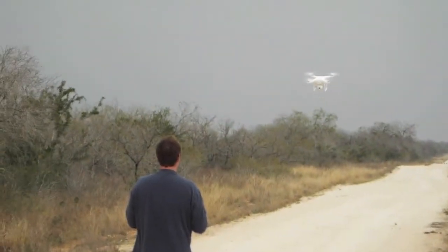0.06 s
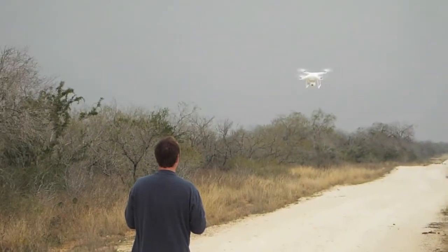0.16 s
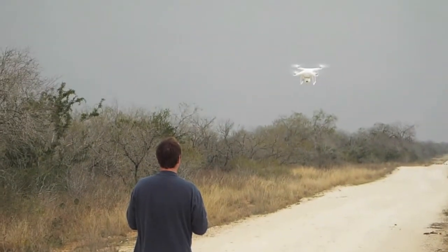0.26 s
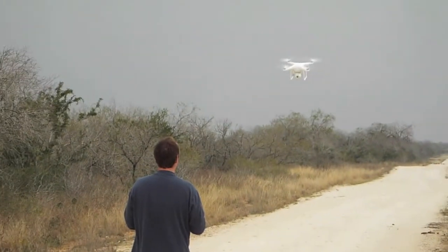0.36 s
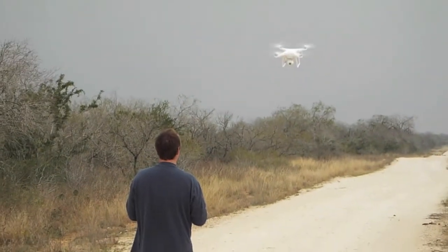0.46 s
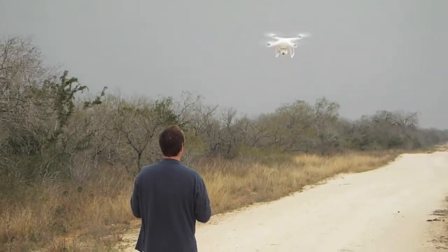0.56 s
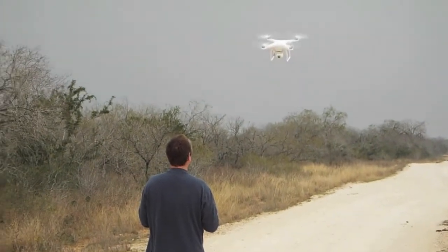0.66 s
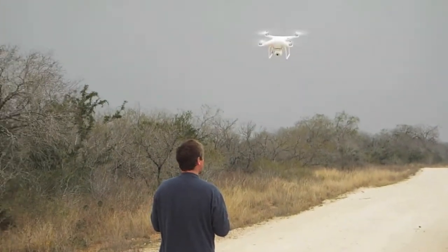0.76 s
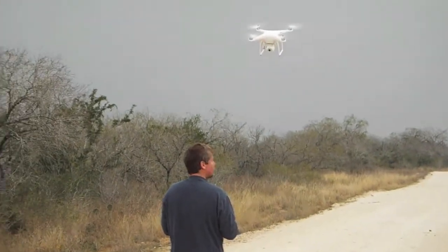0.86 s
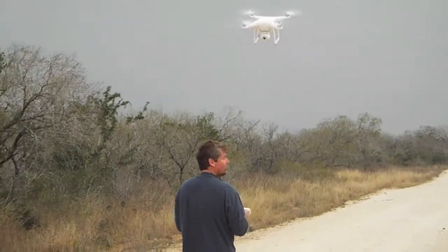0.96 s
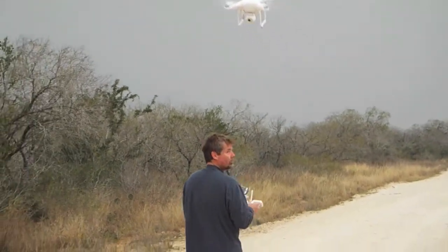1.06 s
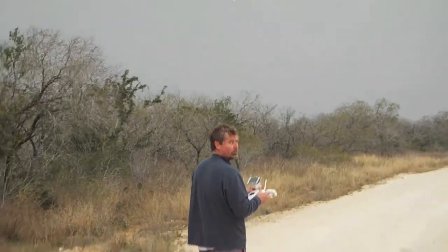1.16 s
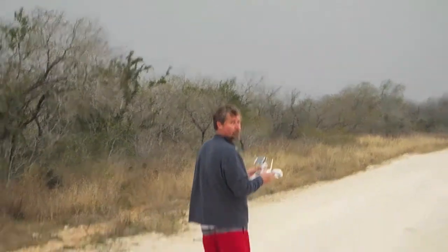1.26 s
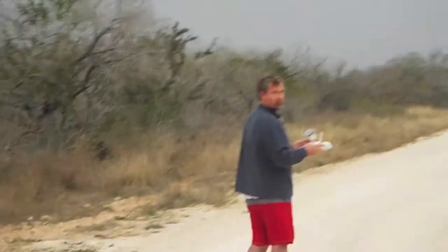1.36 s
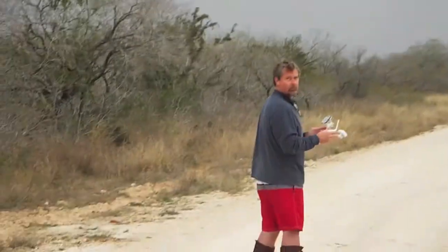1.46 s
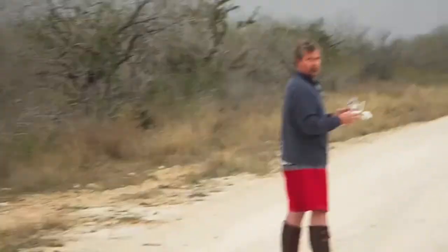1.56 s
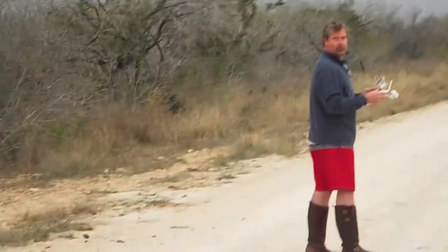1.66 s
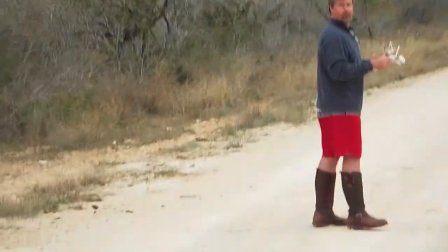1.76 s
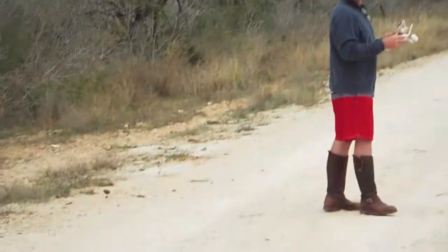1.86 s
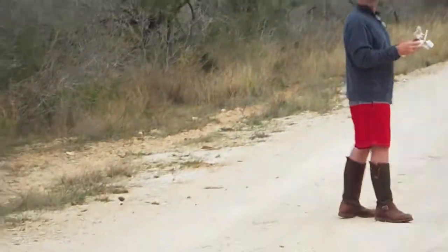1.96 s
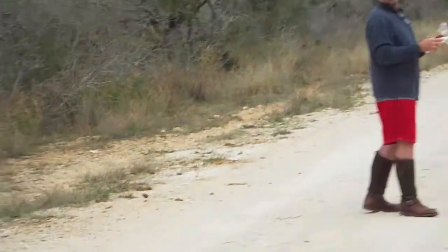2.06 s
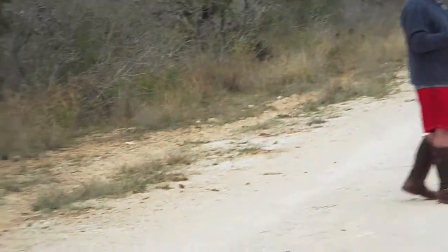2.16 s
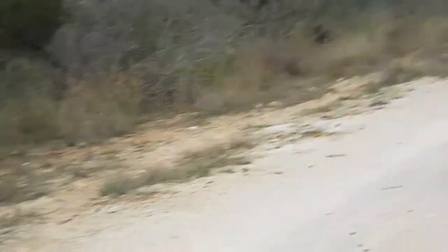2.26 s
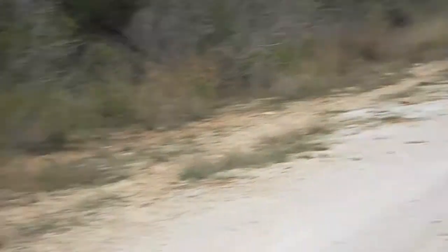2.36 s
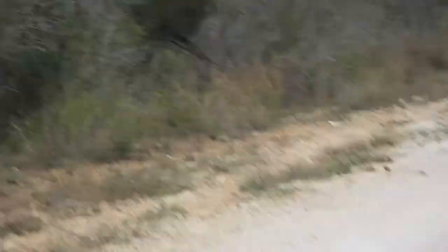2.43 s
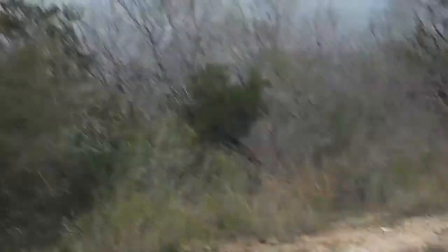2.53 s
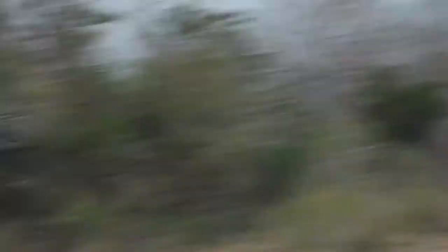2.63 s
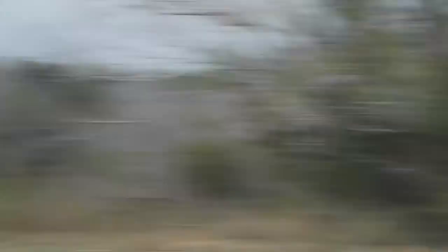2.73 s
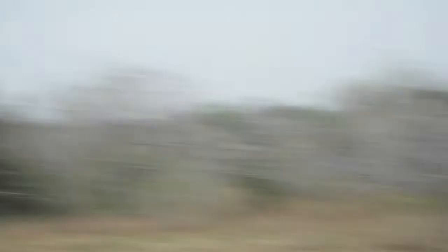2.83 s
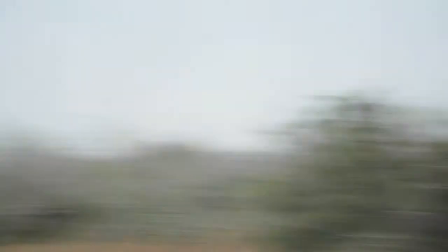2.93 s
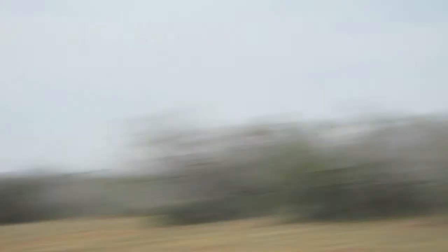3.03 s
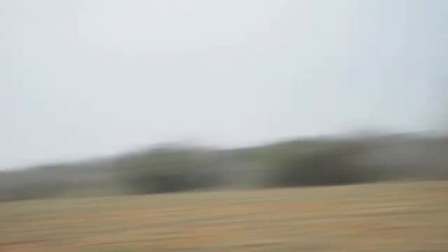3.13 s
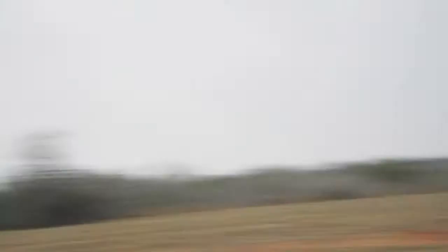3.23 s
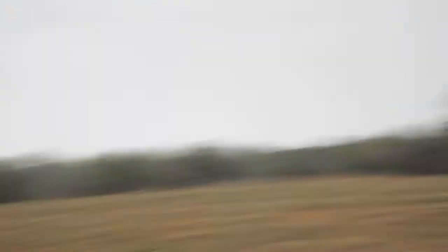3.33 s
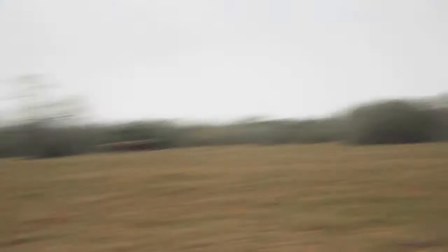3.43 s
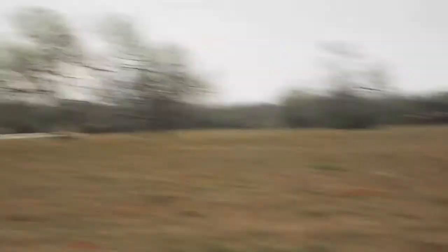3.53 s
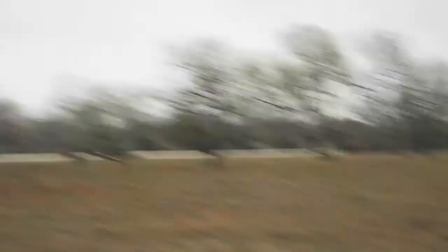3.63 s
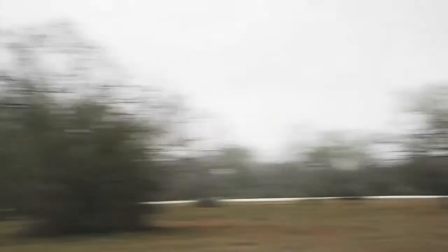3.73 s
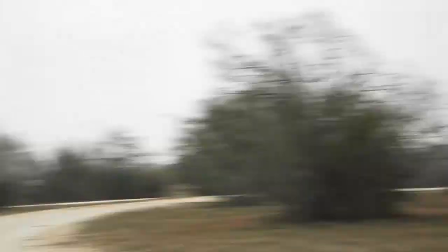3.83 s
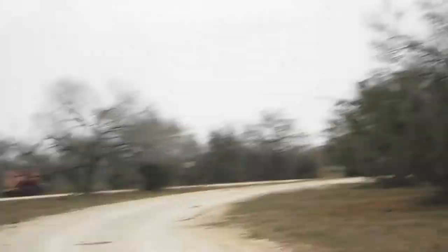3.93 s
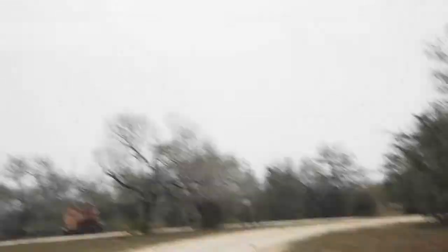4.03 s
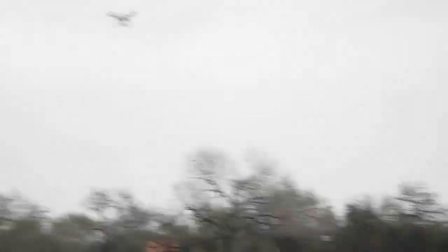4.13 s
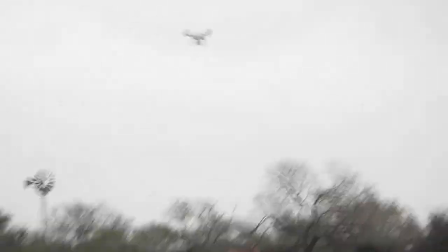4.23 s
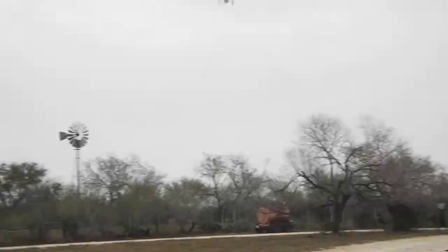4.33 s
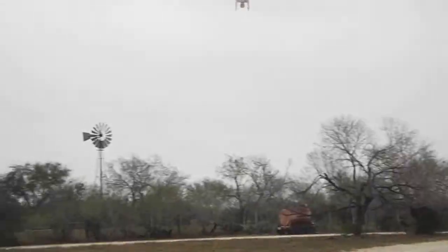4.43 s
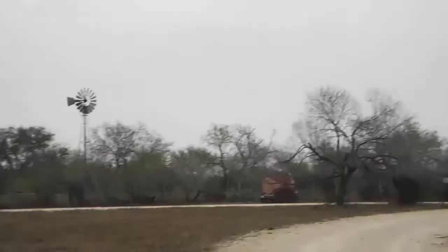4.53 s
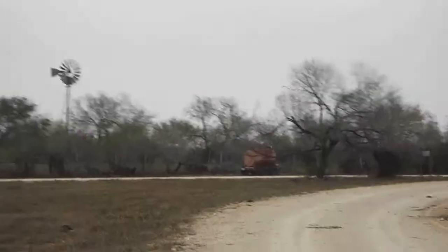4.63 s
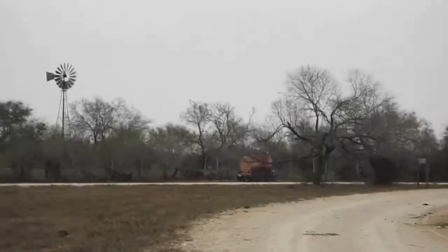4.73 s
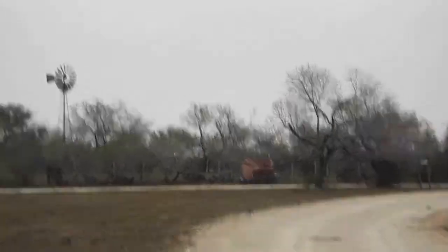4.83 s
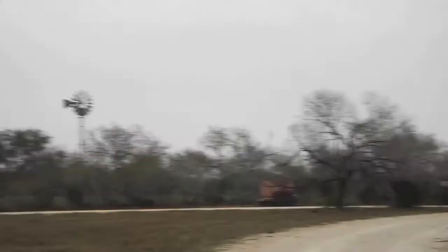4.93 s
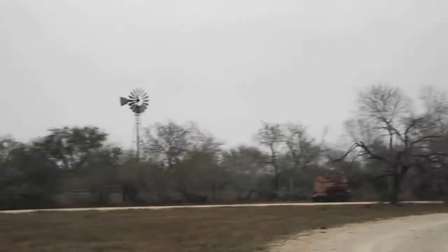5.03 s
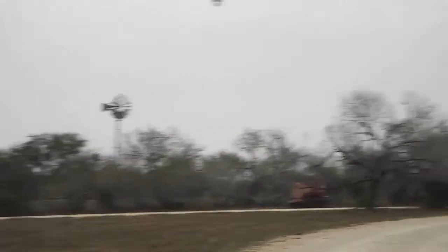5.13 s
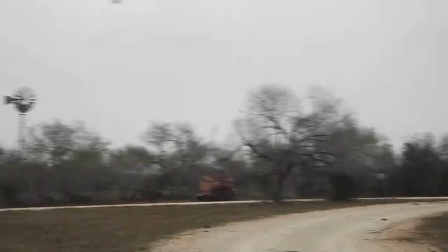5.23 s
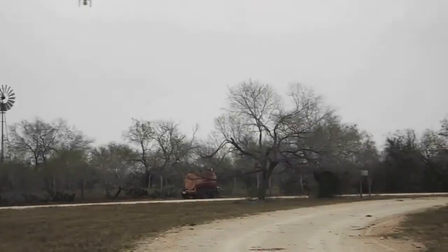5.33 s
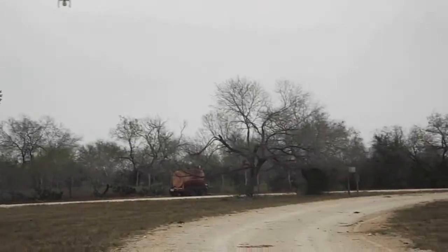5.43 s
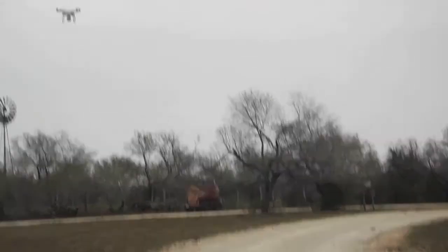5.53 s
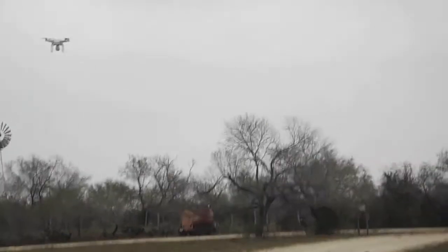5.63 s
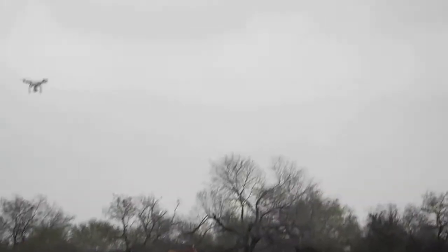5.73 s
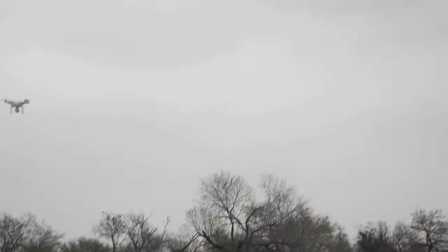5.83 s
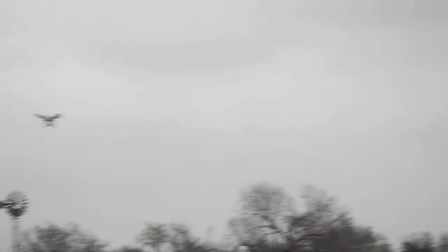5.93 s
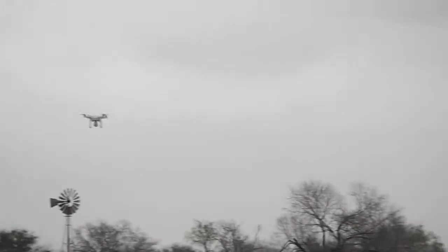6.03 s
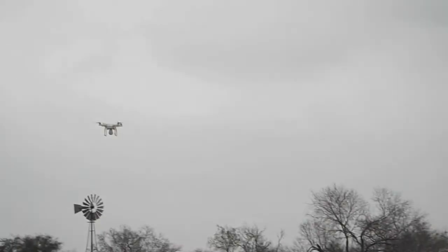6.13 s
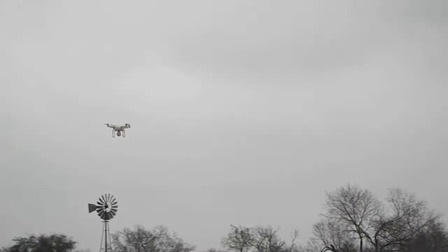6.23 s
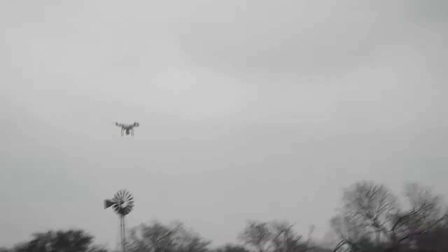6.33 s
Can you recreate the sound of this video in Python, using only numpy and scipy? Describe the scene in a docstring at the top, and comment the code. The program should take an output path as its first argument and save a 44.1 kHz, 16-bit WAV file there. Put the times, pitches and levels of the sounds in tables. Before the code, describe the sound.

Four slightly mistuned propellers buzz ahead, growing louder and raspier until the drone rushes overhead close to a hand-held stereo microphone. The pitch sinks as it leaves, smoother and hissier. Wind buffets the microphone in low knocks and crackling pops during the swing. The housing clicks loudly once, the motors rise for braking, then ease to a faint steady whirr in open, dry air with little background.

```python
"""Over a dirt road, a small quadcopter flies low, passes close above a hand-held camera, brakes and hovers far off.
Four propellers whine as sets of harmonics and rasp as noise chopped by the blades, each at its own speed.
Delayed copies, off the ground and the camera's body, sweep combs through the sound.
Noise bursts and pressure pulses make the wind on the swinging camera; short decaying noises make its housing click.
A limiter ducks after the loudest knocks."""
import sys
import numpy as np
from scipy import signal
from scipy.fft import rfft, irfft, next_fast_len
from scipy.io import wavfile
from scipy.ndimage import uniform_filter1d, map_coordinates

SR = 44100
rng = np.random.default_rng(int(sys.argv[2]) if len(sys.argv) > 2 else 0)


def store_wav(level_fs):
    """Save 16-bit WAV to argv[1]."""
    pcm = np.round(np.clip(np.atleast_2d(level_fs), -1, 1) * 32767)
    wavfile.write(sys.argv[1], SR, pcm.T.astype(np.int16))


N = 281887
TIME = np.arange(N) / SR
TOP_HZ = 16000  # upper limit of the band

# the four propellers as heard: start_s, blade_pass_hz
LEAD_ROTOR = [(0, 235), (.5, 236), (1.2, 237), (1.6, 240.5), (1.8, 238), (1.98, 236), (2.08, 227),
              (2.2, 224), (2.32, 215), (2.57, 220), (2.7, 207), (2.9, 195), (3.1, 193), (3.4, 185),
              (3.7, 187), (3.95, 185), (4.05, 192), (4.5, 197.5), (4.65, 197), (4.8, 220), (5, 224),
              (5.15, 231), (5.28, 230), (5.48, 213), (5.85, 205), (6.39, 200.5)]
UNBALANCED_ROTOR = [(0, 249), (.6, 246), (1.15, 248), (1.45, 252), (1.92, 249), (2.08, 238), (2.3, 233),
                    (2.45, 233), (2.56, 243), (2.7, 213), (2.85, 214), (3.25, 204), (3.33, 209), (3.6, 208),
                    (3.75, 203), (4, 212), (4.25, 218), (4.45, 230), (4.55, 239), (4.7, 242), (5, 258),
                    (5.08, 269), (5.2, 269), (5.35, 253), (5.48, 235), (5.8, 226), (6.39, 226.5)]
SLOW_ROTOR = [(0, 187), (.5, 186), (1.4, 189.5), (1.9, 188), (2.05, 181), (2.75, 167.4), (3.15, 173.3),
              (4.1, 166), (4.7, 150), (5.15, 152), (5.38, 166), (5.5, 175.5), (6.39, 178)]
TRIM_ROTOR = [(0, 185), (.5, 177.6), (1.4, 213.8), (1.8, 209.7), (2.75, 183.2), (4.7, 158.5), (5.4, 171),
              (6.39, 188.1)]
# tone balance of the whine: pitch_hz, relative_level_db
WHINE = [(110, -29), (185, -14), (240, -12.5), (360, -8.5), (460, -3.5), (525, -2.5), (565, -3.5), (620, 1),
         (710, 3), (850, -5), (950, -5.5), (1070, -8.5), (1190, -6), (1310, -7.5), (1430, -6),
         (1540, -12.5), (1650, -7), (1780, -18.5), (1900, -16), (2100, -14.5), (3200, -19), (5300, -16.5),
         (8000, -67)]
# how strongly the tones carry as the craft tilts:
# start_s, fast_pair_db, slow_pair_db, unsteadiness (1 = calm air)
TONES = [(0, 1, -0.5, 0.58), (.8, 1, 1, 0.69), (1.45, 2, 2, 1.6), (1.8, 3, 3.5, 1.8), (1.97, 4.5, 2.5, 2),
         (2.1, -2, -2, 2.8), (2.4, -2.5, -3, 4), (2.8, -2, -8, 4.6), (3.5, -1, -2, 3), (4.1, 0, -6, 1),
         (4.65, 1.5, -7, .7), (5.15, 0, -7, .7), (5.5, -.5, 1, .7), (5.8, -1.5, 2.5, 0.68),
         (6.39, -1.5, 2, 0.66)]
# the blades sound sharpest as they advance on the listener: start_s, overtones_db, rasp_chop (0-1)
EDGE = [(0, 0, 0.83), (.6, 2, 0.9), (1.15, 4.5, 0.85), (1.5, 6.5, 0.89), (1.97, 4, 0.67), (2.4, 2.5, .55),
        (3, -5, 0.3), (4, 0.5, 0.35), (5.1, -2.5, 0.5), (5.7, 0, 0.14), (6.39, -2, 0.39)]
# turbulence on the blades, up in the pass and the braking flare, down in the hover: start_s, load_db
LOAD = [(0, -5), (.5, 3), (1.93, -1), (2.1, 2.5), (2.24, 0), (2.4, -1), (2.9, 0), (3.04, 2), (3.35, -1.5),
        (3.6, -1.5), (4.5, 1), (5.05, 5.5), (5.2, 4), (5.36, -3), (5.8, -6), (6.39, -4)]

# colour of the rasp from each side of the craft: pitch_hz, relative_level_db (per Hz)
FRONT = [(150, -12), (400, -14), (750, -2.5), (1050, -8.5), (1700, -9.5), (2500, -3), (3050, -9.5),
         (3600, -6), (4450, -7.5), (5000, -1.5), (5800, -1), (6500, -6.5), (7200, -11), (7900, -13.5),
         (8900, -15), (12000, -23), (16000, -36)]
CLOSE = [(150, -40), (400, -12), (750, -6), (1400, 1.5), (2300, -1), (3050, -5.5), (3450, 1), (4200, -3.5),
         (4750, 0), (5300, 5.5), (6000, 2), (6700, -1.5), (8000, -5.5), (11000, -14), (16000, -27)]
OVERHEAD = [(150, -32), (400, -12), (750, -2), (1400, -7), (2200, -2), (3000, -4), (4200, -1.5),
            (5050, 8.5), (5800, 2.5), (6800, -2), (8000, -5.5), (9500, -8), (11000, -9), (16000, -24)]
BELOW = [(150, -38), (400, -9.5), (750, -10.5), (1300, -7), (2100, -15), (3200, -5.5), (4500, -1),
         (5800, 2), (7000, -4), (8500, -9.5), (11000, -14), (16000, -28)]
LEAVING = [(150, -38), (400, -9), (750, -4), (1300, -4.5), (2100, -5), (2800, -4), (4000, -4.5), (5400, 1),
           (7000, -3), (8100, -4), (9500, -11.5), (12000, -16.5), (16000, -30)]
BEHIND = [(150, -24), (400, -6), (750, 5), (1100, -4), (1800, 1), (2500, 3), (3000, 0), (4400, 2.5),
          (5400, 3.5), (6800, 0), (7700, -4.5), (8200, -6), (9100, -7), (9700, -5.5), (10300, -11.5),
          (12000, -14), (16000, -26)]
BRAKING = [(150, -24), (400, -27), (750, 6), (1100, -3.5), (1800, 2), (2500, 5.5), (3000, -1), (3700, 2.5),
           (4400, 0), (5500, 4.5), (6700, 0.5), (7800, -8), (9000, -7), (12000, -16), (16000, -28)]
FAR = [(150, -20), (400, -7), (700, 1.5), (1000, -1), (1350, 0.5), (1750, 0.5), (3000, 1.5), (3500, 2.5),
       (4200, 2.5), (4850, 5.5), (6300, 1), (7600, -5.5), (10000, -10), (16000, -19)]
# side of the craft that faces the camera: start_s, colour table
FACING = [(1.15, FRONT), (1.42, CLOSE), (1.8, CLOSE), (1.95, OVERHEAD), (2.14, BELOW), (2.75, LEAVING),
          (3.1, LEAVING), (3.7, BEHIND), (4.25, BEHIND), (4.65, BRAKING), (5.151, BRAKING), (5.65, FAR)]
# diffuse share of the rasp: start_s, share_db
SCATTER = [(0, -20), (1.7, -65), (2.3, -24), (3.7, -14), (4.4, -19), (6.39, -5)]
# left-right likeness of the rasp: pitch_hz, likeness (0-1)
ALIKE = [(200, 0.87), (1000, 1), (5000, 1), (15000, 0.98)]
# the same when the camera's body stands in the way: pitch_hz, likeness (0-1)
ALIKE_ASIDE = [(1000, 1), (3500, 1), (5200, .78), (7300, 1), (10000, 0.91), (14000, 0.46)]
# a blade cuts a tip vortex and slaps: start_s (centre), relative_level_db
SLAPS = [(0.8355, -7), (1.1019, -5), (1.112, -8), (1.134, -8), (1.1508, -5), (1.296, 0), (1.3353, -2),
         (1.3438, -4)]
# colour of the slaps: pitch_hz, level_db (per Hz)
SLAP_COLOUR = [(1000, -26), (4400, -5), (5600, 1), (7000, 0), (9000, -9.5), (12000, -19), (16000, -27)]

# echo off the ground: start_s, delay_ms
GROUND_DELAY = [(0, 1.05), (.35, 1.27), (.62, 1.5), (1, 2), (1.25, 2.55), (1.5, 3.35), (2, 4.9), (2.3, 3.7),
                (2.55, 2.95), (2.8, 2.55), (3, 2.32), (3.3, 2.15), (4.2, 1.95), (4.6, 1.8), (5.35, 1.56),
                (5.8, 1.48), (6.39, 1.44)]
# echo off the ground: start_s, strength (0-1)
GROUND_STRENGTH = [(0, 0.48), (.6, 0.47), (1.25, 0.24), (2, 0.052), (2.55, 0.15), (3.1, 0.36), (4.1, 0.18),
                   (4.6, 0.45), (5.4, 0.54), (6.39, 0.38)]
# echoes off the camera's body shift with bearing: start_s, delay_ms, strength (0-1), later_strength (0-1)
BODY_ECHOES = [(0, .565, .36, 0), (1.22, .565, .34, 0), (1.3, .69, .22, .2), (1.45, .74, .22, .24),
               (1.62, .765, .26, .25), (1.8, .75, .26, .25), (1.93, .68, .15, .15), (2.1, .5, .12, .05),
               (2.5, .3, .08, .03), (3.15, .3, .08, .02), (3.3, .41, .25, .04), (3.5, .59, .25, .06),
               (3.7, .72, .2, .1), (3.95, .79, .17, .2), (4.3, .7, .1, .17), (4.56, .555, .22, 0),
               (5.1, .56, .3, 0), (5.35, .61, .2, 0), (6.39, .555, .14, 0)]
# the craft slips to the left while the camera swings after it: start_s, off_axis (0-1)
OFF_AXIS = [(0, 0.04), (1.82, 0.02), (2.03, 0.79), (3.35, 0.92), (3.8, .12), (6.39, 0)]
# difference in colour between the microphone ports: pitch_hz, left_over_right_db
PORT_COLOUR = [(1000, 0.57), (3500, -0.5), (4600, -0.8), (5400, 1), (6200, 3), (7800, 1.7), (9000, 0.5),
               (12000, -0.5)]

# wind strength on the ports: start_s, relative_level_db
BREEZE = [(0, -59), (.2, -43.5), (.35, -45), (.75, -31), (1.35, -41.5), (2.05, -35), (2.4, -43.5),
          (2.9, -33.5), (3.12, -42.5), (3.4, -35), (3.68, -67), (4.15, -66), (4.8, -53.5), (5.2, -54),
          (5.38, -46.5), (5.72, -59.5), (6.39, -62)]
# colour of the wind rumble: pitch_hz, relative_level_db (per Hz)
RUMBLE = [(20, 5.5), (45, -7.5), (90, 1), (160, 1), (300, -1), (600, -12.5), (2000, -59)]
# colour of the small puffs: pitch_hz, relative_level_db (per Hz)
PUFF_COLOUR = [(60, -41), (170, 2.5), (350, -6), (600, -5), (1500, -41), (4000, -90)]
# strong gusts: start_s (centre), relative_level_db, spread_s, top_hz, likeness (left-right, 0-1)
GUSTS = [(0.223, -27.5, 0.014, 450, 0.36), (0.26, -29, 0.0082, 378, 0.25), (0.618, -38, 0.0069, 330, 0.14),
         (0.685, -22.5, 0.011, 463, 0.3), (0.853, -21, 0.006, 599.3, 0.7), (0.905, -19.5, 0.0055, 740, 0),
         (1.022, -28, 0.0077, 350, 0.12), (1.069, -22, 0.0088, 666, 0.24), (1.2, -30, 0.006, 303, 0.2),
         (1.55, -25.5, 0.016, 350, 0.11), (1.655, -27, 0.013, 433, 0), (2.482, -5, 0.0024, 680, 0.23),
         (2.502, -13.5, 0.0053, 604, 0.33), (2.655, -23, 0.018, 404, 0.24), (2.93, -12.5, 0.014, 587, 0),
         (2.97, -7.5, 0.012, 740, 0.14), (3.355, -20, 0.015, 506, 0.03), (3.42, -28.5, 0.027, 596, 0),
         (3.501, -25, 0.02, 1120, 1), (3.775, -30.5, 0.012, 1195, 1), (3.843, -29, 0.007, 1300, 1),
         (3.87, -35, 0.06, 1300, 1), (3.807, -35, 0.0053, 170, 0.1), (3.896, -23, 0.005, 1190, 1),
         (3.928, -28.5, 0.0092, 1406, 1), (4.79, -34, 0.0054, 278, 0.17), (4.914, -41, 0.0084, 279.2, .3),
         (5.369, -33, 0.0096, 327, 0.32), (5.435, -38, 0.0096, 260, 0.5), (5.578, -41, 0.0088, 199, 0.4)]
# slow pressure of the strongest gusts on the diaphragm: start_s (centre), relative_pressure_db, spread_s
SHOVES = [(2.484, -1.5, 0.024), (2.923, -9, 0.021), (2.962, 1, 0.031)]
# sharp wind pops: start_s (centre), relative_peak_db, half_width_ms
POPS = [(0.901, -15, 0.36), (1.07, -18, 0.43), (2.483, 0, 0.21), (2.915, -9, 0.24), (2.941, 1, 0.1),
        (2.962, 8.5, 0.16), (3.317, -10, 0.37), (3.375, -11, 0.2), (3.399, 1, 0.1), (3.421, -2.5, 0.12),
        (3.436, -2.5, 0.11), (3.496, -17, 0.14), (3.522, -13, 0.2)]
# clicks of the camera housing: start_s, relative_level_db, top_hz
CLICKS = [(4.122, -15.5, 6080), (4.183, -21, 6000), (4.291, -19, 6000), (4.461, -20, 6073),
          (4.5013, 4, 8160), (4.5035, 5, 8840), (4.5072, 8.5, 9000), (4.657, -18, 4980), (4.768, -16, 5000),
          (4.953, -11.5, 8930), (5.522, -16, 3022)]
# ring of the housing: pitch_hz, relative_level_db (per Hz)
HOUSING = [(60, -20), (200, -4), (800, -8), (1200, 1), (1600, 3), (2800, 7), (3600, 2), (4500, 13.5),
           (5300, -1), (6000, 8), (7000, -5), (7700, 5), (9000, -9), (16000, -24)]
# steady outdoor rumble: pitch_hz, relative_level_db (per Hz)
FLOOR = [(20, 10.5), (45, 1), (90, -1.5), (200, -22), (600, -30), (2000, -60)]

# the flight: a straight line past the camera, then the craft brakes
PASS_S, CLOSEST_M, SPEED_M_PER_S = 2.057, 1.8, 9.92
BRAKE_S, BRAKE_TIME_S = 4.25, 0.6
SPREAD_DB = 21.5  # loss for each tenfold distance
TURNED_M = 11.6  # this far past the camera, the craft is heard wholly from behind
# the whine grows with tip speed (dB per tenfold speed over cruise) and with a share of the blade load
CRUISE_HZ, TIP_SPEED_DB, LOAD_SHARE = 257.4, 62, 0.29
WAVER, WAVER_PER_S = 0.22, 13  # depth and rate at which the harmonics swell and fade in rough inflow
# low tones swell through the pass and as the craft leaves
THRUM_DB, THRUM_S, THRUM_WIDTH_S, THRUM_HZ = 6, 2.48, 1.16, 510
CRACKLE_HZ, BODY_CHOP = 3740, 0.73  # the rasp pulses hardest above this pitch; share of the chop below it
ECHO_GAP_MS = 0.18  # between the successive echoes off the camera
OFF_AXIS_DB, OFF_AXIS_LAG_MS = 0.45, 0.018  # fully off axis: left over right, and right port late
PUFF_DB, PUFF_SWING_DB, PUFFS_PER_S = -5, 8.5, 45  # small random gusts ride on the breeze
FLOOR_DB = -52


def drone():
    """Four propellers whine and rasp, the unbalanced one rasping hardest, with echoes on the way to the ports."""
    overtones_db, chop = curves(EDGE)
    lead, lead_sweep = propeller(
        LEAD_ROTOR, ahead_db=-15.5, behind_db=-12.0, odd_db=-49.0, uneven=0.12, flutter=0.00228)
    rough, rough_sweep = propeller(
        UNBALANCED_ROTOR, ahead_db=-22.5, behind_db=-14.0, odd_db=-5.0, uneven=0.42, flutter=0.00237)
    slow, slow_sweep = propeller(
        SLOW_ROTOR, ahead_db=-17.0, behind_db=-14.5, odd_db=-4.5, uneven=0.085, flutter=0.00355)
    trim, trim_sweep = propeller(
        TRIM_ROTOR, ahead_db=-25.5, behind_db=-22, odd_db=-32, uneven=0.1, flutter=0.00507)

    fast_db, slow_db, _ = curves(TONES)
    tones = amp(fast_db) * (lead + rough) + amp(slow_db) * (slow + trim)
    whine = filtered(tones, lambda hz: amp(along(WHINE, hz)))
    overtones = filtered(whine, lambda hz: above(hz, 850.0, 12))
    thrum = filtered(whine, lambda hz: 1 / (1 + (hz / THRUM_HZ) ** 8))
    thrum_db = THRUM_DB * np.exp(-((TIME - THRUM_S) / THRUM_WIDTH_S) ** 2)
    whine = whine + (amp(overtones_db) - 1) * overtones + (amp(thrum_db) - 1) * thrum

    # the sharper the rasp, the more the unbalanced propeller stands out in it
    others = 0.091 * lead_sweep + 0.22 * (slow_sweep + trim_sweep)
    sweep = rough_sweep + np.clip(1.84 * (1.05 - chop), 0.1, 2) * others
    hiss = off_camera(rasp(sweep, chop, rasp_db=-7.0) + slaps(slap_db=0.5, width_ms=0.22))

    ground = curves(GROUND_DELAY) + curves(GROUND_STRENGTH)
    return at_ports(echoes(whine + hiss, [ground], dull_hz=4970))


def propeller(table, ahead_db, behind_db, odd_db, uneven, flutter, order=64, size=4096):
    """A two-blade propeller: its pressure pulses, and the rhythm in which its blades sweep toward the listener."""
    blade_hz, = curves(table)
    unsteady = curves(TONES)[2]
    # the speed wanders, and rough air jostles each blade
    turns_per_s = blade_hz / 2 * (1 + flutter * unsteady * wobble(20))
    turns = np.cumsum(turns_per_s) / SR + 0.0018 * wobble(120)
    # unequal blades put lines halfway between the blade-pass harmonics
    k = np.arange(order)
    lines = np.where(k % 2, amp(odd_db), 1) * (k > 0)

    def spin():
        """The same harmonics with fresh random phases, read once a turn."""
        phases = np.exp(2j * np.pi * rng.random(order))
        one_turn = irfft(lines * phases, size) * size / 2
        return np.interp(turns % 1 * size, np.arange(size), one_turn)

    # two more spins fade in and out, so each harmonic wavers by itself
    waver = wobble(WAVER_PER_S) * spin() + wobble(WAVER_PER_S) * spin()
    pulses = spin() + WAVER * np.sqrt(np.abs(unsteady)) * waver
    level_db = whine_level(blade_hz, ahead_db, behind_db) + 1.3 * wobble(14)

    # two sweeps a turn, one stronger than the other
    blade = np.cos(2 * np.pi * turns)
    sweep = blade ** 26 * (1 + np.clip(uneven, 0, 1) * blade)
    return amp(level_db) * pulses, sweep


def whine_level(blade_hz, ahead_db, behind_db):
    """A propeller's level in dB from distance, facing, tip speed and load."""
    near_db, behind = flight()
    effort_db = TIP_SPEED_DB * np.log10(blade_hz / CRUISE_HZ) + LOAD_SHARE * curves(LOAD)[0]
    return near_db + effort_db + ahead_db + (behind_db - ahead_db) * behind


def flight():
    """Level in dB that distance leaves, and how far the craft shows its rear (0-1)."""
    braking_s = np.maximum(TIME - BRAKE_S, 0)
    # speed decays exponentially once the craft brakes
    flown_s = TIME - braking_s + BRAKE_TIME_S * (1 - np.exp(-braking_s / BRAKE_TIME_S))
    past_m = SPEED_M_PER_S * (flown_s - PASS_S)
    near_db = -SPREAD_DB * np.log10(np.hypot(past_m / CLOSEST_M, 1))
    return near_db, np.clip(past_m / TURNED_M, 0, 1)


def rasp(sweep, chop, rasp_db):
    """Turbulent hiss bursts at each blade sweep, crispest in the treble; it recolours as the craft turns."""
    bursts = np.abs(sweep) * amp(3.4 * wobble(170) + 1.1 * wobble(45))
    bursts = bursts / bursts.mean()
    aside = np.clip(curves(OFF_AXIS)[0], 0, 1)

    def chopped(depth):
        """Stereo noise with its power pulsed by the blades."""
        depth = np.clip(depth, 0, 1)
        eddies = np.sqrt(1 - aside) * stereo_noise(ALIKE) + np.sqrt(aside) * stereo_noise(ALIKE_ASIDE)
        return eddies * np.sqrt(1 - depth + depth * bursts)

    crackle = filtered(chopped(chop), lambda hz: np.sqrt(above(hz, CRACKLE_HZ, 6)))
    body = filtered(chopped(BODY_CHOP * chop), lambda hz: np.sqrt(1 - above(hz, CRACKLE_HZ, 6)))
    # the brush scatters part of the rasp into steady, wide noise
    diffuse = amp(curves(SCATTER)[0])
    air = (crackle + body + diffuse * rng.standard_normal((2, N))) / np.hypot(1, diffuse)
    air = filtered(air, lambda hz: above(hz, 160, 4))

    # crossfade from one side's colour to the next
    times = [s for s, _ in FACING]
    hiss = 0
    for share, (_, colour) in zip(np.eye(len(FACING)), FACING):
        hiss = hiss + np.interp(TIME, times, share) * coloured(air, colour)
    return hiss * amp(rasp_db + flight()[0] + curves(LOAD)[0] + 0.65 * wobble(24.94))


def slaps(slap_db, width_ms):
    """Single sharp spits of noise from the blades as the craft bears down on the camera."""
    bursts = 0
    for s, db in SLAPS:
        bursts = bursts + amp(db + slap_db) * swell(s, width_ms / 1000)
    return filtered(bursts * rng.standard_normal(N), lambda hz: amp(along(SLAP_COLOUR, hz)))


def off_camera(x):
    """One echo off the camera's body, and two later ones at some bearings."""
    ms, first, later = curves(BODY_ECHOES)
    paths = [(ms, first), (ms + ECHO_GAP_MS, later), (ms + 2 * ECHO_GAP_MS, 0.51 * later)]
    return echoes(x, paths, dull_hz=18600)


def echoes(x, paths, dull_hz):
    """Add dulled reflections, each a (delay ms, strength); their changing delays sweep combs through the sound."""
    soft = filtered(x, lambda hz: 1 / (1 + (hz / dull_hz) ** 2))
    out = x
    for ms, strength in paths:
        late = np.array([map_coordinates(side, [(TIME - ms / 1000) * SR]) for side in soft])
        out = out + strength * late
    return out


def at_ports(craft):
    """Each port has its own colour; off the camera's axis, the left one hears the craft louder and sooner."""
    off, = curves(OFF_AXIS)
    sides = np.array([[0.5], [-0.5]])
    craft = filtered(craft, lambda hz: amp(sides * along(PORT_COLOUR, hz)))
    left, right = craft * amp(sides * OFF_AXIS_DB * off)
    right = map_coordinates(right, [(TIME - OFF_AXIS_LAG_MS * off / 1000) * SR])
    return np.array([left, right])


def wind(rumble_db, gust_db, pop_db):
    """Air on the ports: rumble with small puffs, strong gusts, slow shoves and sharp pops."""
    return breeze(rumble_db) + gusts(gust_db) + shoves() - pops(pop_db)


def breeze(rumble_db):
    """Low turbulence on the ports, nearly unrelated left and right, with small random puffs on top."""
    breeze_db, = curves(BREEZE)
    rumble = coloured(stereo_noise([(100, 0.034)]), RUMBLE)
    rumble = rumble * amp(rumble_db + breeze_db + 4.0 * wobble(24.03) + 2.6 * wobble(64))
    puffs = coloured(stereo_noise([(100, 0.13)]), PUFF_COLOUR)
    puffs = puffs * amp(PUFF_SWING_DB * np.minimum(wobble(PUFFS_PER_S), 2))
    return rumble + puffs * amp(PUFF_DB + breeze_db)


def gusts(gust_db):
    """Each strong gust is a short swell of churning, band-limited noise, partly shared by the two ports."""
    churn = amp(3.9 * wobble(140))
    out = np.zeros((2, N))
    for s, db, spread_s, top_hz, alike in GUSTS:
        band = signal.butter(2, [top_hz * 0.31, top_hz], "band", fs=SR, output="sos")
        shared = np.clip(alike, 0, 1)
        eddies = np.sqrt(shared) * rng.standard_normal(N)
        eddies = eddies + np.sqrt(1 - shared) * rng.standard_normal((2, N))
        out += swell(s, spread_s) * amp(db + gust_db) * unit(signal.sosfilt(band, eddies * churn))
    return out


def shoves():
    """The strongest gusts press slowly on the diaphragm, alike on both sides."""
    return sum(amp(db) * swell(s, spread_s) for s, db, spread_s in SHOVES)


def pops(pop_db):
    """Sharp one-way pressure pulses, alike on both sides."""
    out = np.zeros(N)
    for s, db, half_ms in POPS:
        # 1.32 brings the pulse to half its peak at the half width
        away = np.minimum(np.abs(TIME - s) * 1000 / half_ms, 30) * 1.32
        out += amp(db + pop_db) / np.cosh(away)
    return out


def clicks(click_db, t60):
    """The plastic housing snaps under the hand and rings for a few milliseconds; gentle touches are duller."""
    ring = coloured(stereo_noise([(1000, 0.39)]), HOUSING)
    out = 0
    for s, db, top_hz in CLICKS:
        soft = signal.butter(2, min(top_hz, TOP_HZ), fs=SR, output="sos")
        decay = amp(click_db + db - 60 * np.abs(TIME - s) / t60) * (TIME >= s)
        out = out + signal.sosfilt(soft, ring) * decay
    return out


def outdoor_rumble():
    """Steady, low coloured noise under everything."""
    return amp(FLOOR_DB) * coloured(stereo_noise([(100, 0.4)]), FLOOR)


def limiter_gain(x, ceiling_db, release_db_per_s, size=44):
    """The gain drops at once when the short-term level passes the ceiling, then climbs back steadily."""
    power = np.abs(uniform_filter1d(np.mean(x ** 2, axis=0), size))
    over_db = np.maximum(10 * np.log10(power + 1e-12) - ceiling_db, 0)
    ramp_db = release_db_per_s * TIME
    return amp(ramp_db - np.maximum.accumulate(over_db + ramp_db))


def amp(db):
    """Decibels to gain."""
    return 10 ** (np.asarray(db) / 20)


def unit(x):
    """Scale to rms 1."""
    return x / np.sqrt(np.mean(x ** 2) + 1e-20)


def along(points, hz):
    """Read (Hz, value) points on a log axis."""
    f, v = np.transpose(points)
    return np.interp(np.log(hz + 1), np.log(f + 1), v)


def curves(rows):
    """One value per sample for each column after the time."""
    s, *cols = np.transpose(rows)
    return [np.interp(TIME, s, c) for c in cols]


def wobble(rate):
    """A smooth random curve, rate knots a second."""
    knots = rng.standard_normal(int(N * rate / SR) + 4)
    return map_coordinates(knots, [TIME * rate])


def swell(centre_s, spread_s):
    """A bell-shaped rise and fall that peaks at 1."""
    return np.exp(-0.5 * ((TIME - centre_s) / spread_s) ** 2)


def above(hz, corner_hz, power):
    """A high-pass response, one half at the corner."""
    return hz ** power / (hz ** power + corner_hz ** power)


def filtered(x, response):
    """x times a response of frequency."""
    m = next_fast_len(N + 8192)
    return irfft(rfft(x, m) * response(np.fft.rfftfreq(m, 1 / SR)), m)[..., :N]


def coloured(x, spectrum):
    """x shaped by the given spectrum, at rms 1."""
    return unit(filtered(x, lambda hz: amp(along(spectrum, hz))))


def stereo_noise(alike):
    """White noise on two channels, as alike as given at each frequency."""
    def mid_side(hz):
        """Gains of the shared and the opposed noise."""
        turn = np.arccos(np.clip(along(alike, hz), -1, 1)) / 2
        return np.array([np.cos(turn), np.sin(turn)])

    mid, side = filtered(rng.standard_normal((2, N)), mid_side)
    return np.array([mid + side, mid - side])


def scene():
    """The craft, the wind from the left, the hand on the right side of the camera and a low outdoor rumble."""
    craft = drone()
    air = wind(rumble_db=2.5, gust_db=2.5, pop_db=-4.5) * amp([[1.2], [-1.2]])
    hand = clicks(click_db=3.0, t60=0.013) * amp([[-2.7], [2.7]])
    return craft + air + hand + outdoor_rumble()


def record(dry):
    """Wind filter, a limiter that senses the unfiltered pressure, clipping at full scale and the band limit."""
    thin = filtered(dry, lambda hz: above(hz, 39, 8))
    held = thin * limiter_gain(dry, ceiling_db=-3.5, release_db_per_s=200)
    return filtered(np.clip(held, -1, 1), lambda hz: hz < TOP_HZ)


dry = scene()
out = record(dry)
store_wav(out)
```